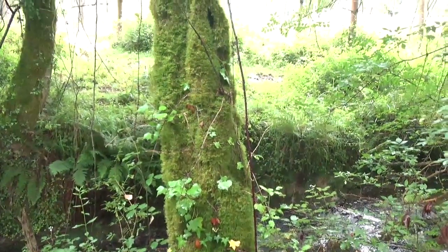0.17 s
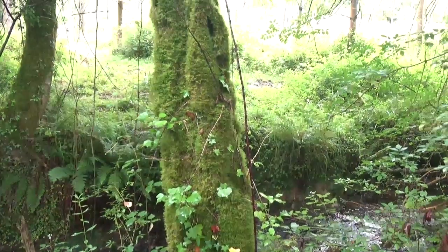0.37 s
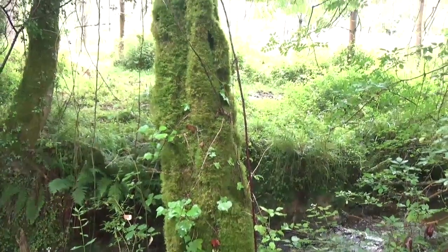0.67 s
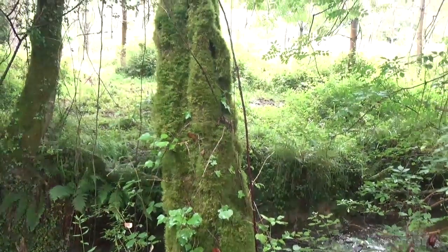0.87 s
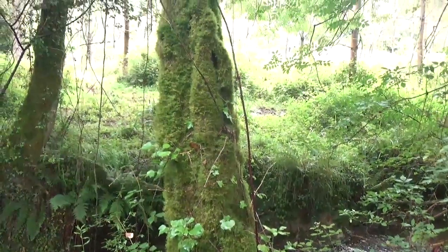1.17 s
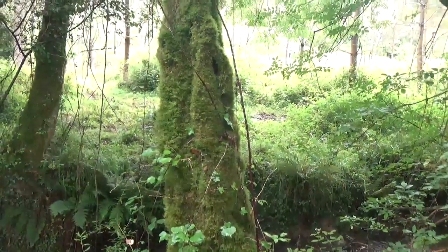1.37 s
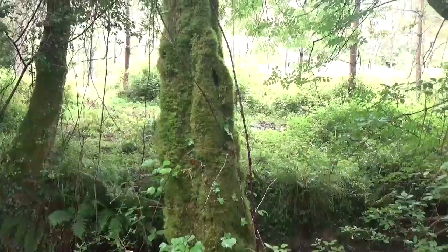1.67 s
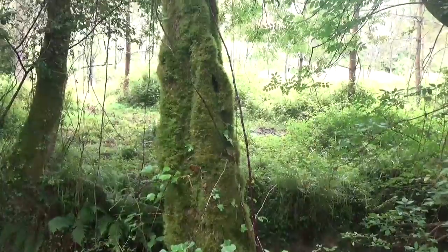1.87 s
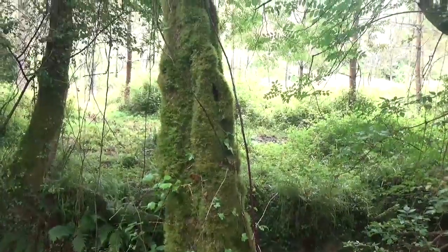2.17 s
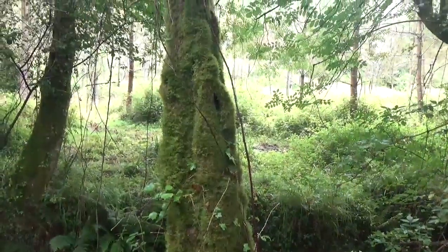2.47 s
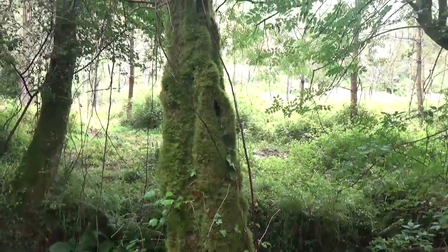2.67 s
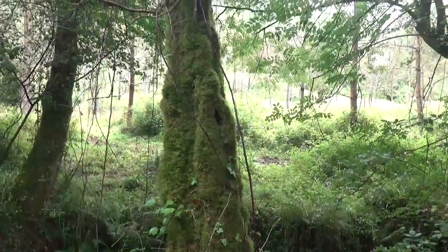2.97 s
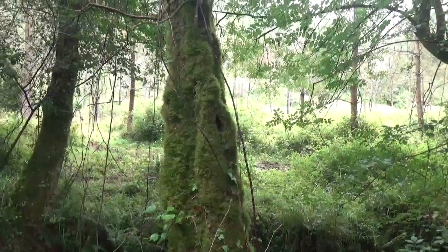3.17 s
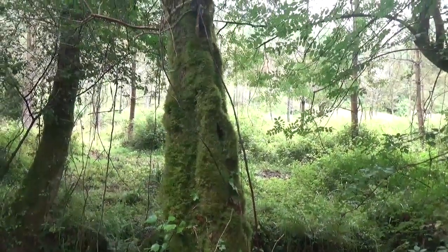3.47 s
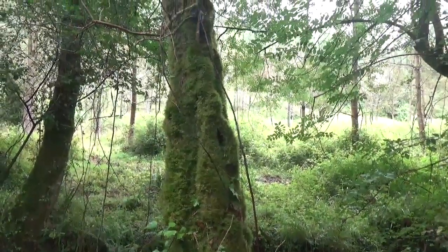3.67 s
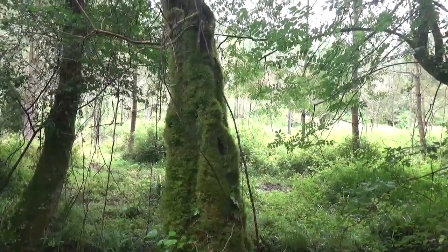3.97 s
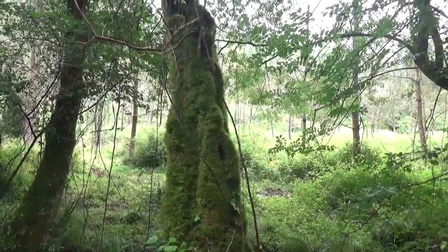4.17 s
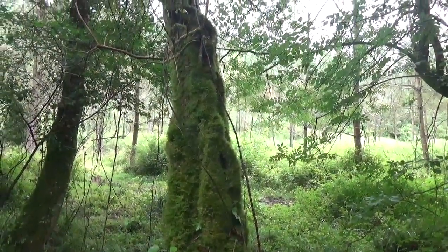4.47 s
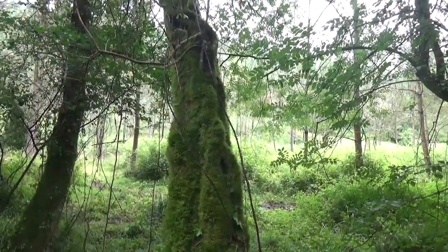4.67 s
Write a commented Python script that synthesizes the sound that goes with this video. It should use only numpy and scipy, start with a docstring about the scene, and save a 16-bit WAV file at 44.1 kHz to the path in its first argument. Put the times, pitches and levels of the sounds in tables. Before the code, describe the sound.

A shallow stream babbles and patters steadily over stones in a wood, with thin bird chirps and a faint distant engine hum slowly rising.

```python
"""A shallow stream runs over stones in a wood, with thin bird calls, a distant engine that slowly
speeds up, and a few soft knocks of a hand on the microphone.
Far water is shaped, flickering noise; bubbles are damped sines that rise in pitch; drops are very short ones;
splashes are bursts of bright noise. Birds are warbling sine glides, the engine is one wavering sine, and knocks
are low damped sines. Scattered echoes surround the near water, the birds and the engine."""
import sys
import numpy as np
from scipy import signal
from scipy.fft import rfft, irfft
from scipy.io import wavfile

SR = 44100
rng = np.random.default_rng(int(sys.argv[2]) if len(sys.argv) > 2 else 0)


def waveform_to_disk(signal):
    """Save audio, clipped to [-1, 1], as 16-bit WAV at the path in sys.argv[1]."""
    frames = np.transpose(np.atleast_2d(signal))
    scaled = np.clip(frames, -1, 1) * 32767
    samples = np.round(scaled).astype(np.int16)
    wavfile.write(sys.argv[1], SR, samples)


def ratio(d):
    """dB to gain"""
    e = np.asarray(d, float) / 20
    return 10 ** e


N = 212948

# loudest bubbles: (time [s], level before the envelope [dB], starting pitch [Hz])
LOUD_BUBBLES = [(0.011, -32, 780), (0.04, -33, 623), (0.059, -32, 546), (0.077, -29, 4740),
                (0.087, -34, 570), (0.145, -30, 3004), (0.21, -26.5, 1223), (0.231, -32, 1680),
                (0.254, -28, 8430), (0.274, -34, 983), (0.323, -32, 1994), (0.325, -33, 3180),
                (0.362, -27, 7400), (0.405, -28, 1588), (0.528, -32, 2690), (0.581, -27.5, 2020),
                (0.613, -27, 8530), (0.617, -31, 1695), (0.641, -31, 1420), (0.68, -26.5, 1490),
                (0.713, -32, 1050), (0.74, -30.5, 840), (0.771, -32, 744), (0.787, -33, 940),
                (0.839, -34, 914), (0.916, -28.5, 1900), (0.921, -36, 1052), (0.927, -31, 1268),
                (0.957, -30, 1020), (1.021, -28, 7770), (1.051, -27.5, 1920), (1.075, -34.5, 720),
                (1.075, -33, 2748), (1.266, -33, 845), (1.284, -32, 3280), (1.299, -28, 6030),
                (1.303, -36, 1720), (1.316, -30.5, 1001), (1.496, -31, 2280), (1.516, -31, 2860),
                (1.524, -33, 1065), (1.586, -28, 7200), (1.637, -36, 1331), (1.67, -27, 7550),
                (1.701, -30, 1305), (1.702, -36, 2600), (1.75, -34, 1975), (1.754, -34, 1644),
                (1.785, -35, 1454), (1.86, -32, 4540), (1.862, -31.5, 1356), (1.946, -30.5, 1564),
                (1.948, -30, 6040), (2.004, -30, 1232), (2.044, -34, 1127), (2.127, -24, 8100),
                (2.133, -30.5, 553), (2.162, -25.5, 8090), (2.183, -35, 1938), (2.358, -32.5, 1983),
                (2.358, -31, 4726), (2.382, -33, 1347), (2.389, -34.5, 2295), (2.589, -33, 2224),
                (2.624, -35, 1239), (2.628, -30.5, 4970), (2.654, -33, 1343), (2.675, -39, 1130),
                (2.69, -35, 2190), (2.708, -34, 2203), (2.727, -36, 1440), (2.738, -34, 2960),
                (2.739, -30, 2440), (2.905, -31, 1630), (2.957, -35, 533), (2.983, -29, 1009),
                (3.046, -40, 1715), (3.096, -29.5, 1397), (3.123, -23, 8600), (3.129, -33, 898),
                (3.206, -31, 1420), (3.214, -34, 4514), (3.225, -33, 1537), (3.246, -34, 1887),
                (3.276, -32, 1233), (3.299, -31, 2707), (3.302, -33, 965), (3.341, -32.5, 914),
                (3.369, -33, 2310), (3.395, -33, 6020), (3.6, -29.5, 2070), (3.639, -34, 799),
                (3.707, -33, 1310), (3.738, -25, 9510), (3.831, -30.5, 2090), (3.843, -33, 1690),
                (3.868, -32, 2820), (3.875, -30, 2090), (3.882, -26.5, 1220), (3.953, -40, 814),
                (4.025, -26, 1345), (4.1, -29, 1117), (4.184, -34, 3470), (4.19, -35, 531),
                (4.242, -34, 1255), (4.268, -26, 7080), (4.304, -32, 4580), (4.317, -37, 476),
                (4.341, -30, 1210), (4.359, -36, 1424), (4.389, -34, 3790), (4.399, -32, 780),
                (4.409, -34, 2120), (4.525, -31, 1547), (4.62, -30, 955), (4.704, -32, 2290),
                (4.744, -27, 8800), (4.778, -30, 990)]
# sharpest drops on stone: (time [s], level before the envelope [dB], starting pitch [Hz])
SHARP_DROPS = [(0.0258, -33, 7170), (0.1497, -24, 8760), (0.2134, -23, 10600), (0.4633, -33, 7090),
               (0.5686, -23, 10340), (0.7872, -20, 8050), (0.985, -29, 8000), (1.012, -30, 6500),
               (1.2201, -22, 7040), (1.2677, -23, 7035), (1.361, -23, 9920), (1.432, -26, 6810),
               (1.813, -24, 7800), (1.826, -30, 8450), (1.976, -23, 7000), (2.0486, -26, 9140),
               (2.326, -24, 10280), (2.4197, -22, 7250), (2.513, -20, 8470), (2.6586, -34, 9370),
               (2.7318, -27, 9580), (2.8928, -30.5, 7850), (3.051, -27, 8800), (3.06, -29, 7810),
               (3.1169, -34, 8690), (3.1458, -22, 10060), (3.673, -25, 10470), (3.7385, -19, 9310),
               (3.863, -21, 10210), (3.9439, -31, 9690), (4.0223, -38, 6680), (4.155, -24, 9870),
               (4.1847, -19, 10170), (4.268, -26, 7610), (4.398, -31, 8630), (4.5, -25, 10210),
               (4.6024, -23, 7770), (4.7444, -23, 10000), (4.775, -27, 9000)]


def rms_one(x):
    """Scale to rms 1."""
    return x / np.sqrt(np.mean(x ** 2) + 1e-20)


def in_time(rows):
    """Columns of a curve, one value per sample."""
    s, *columns = np.transpose(rows)
    return [np.interp(np.arange(N) / SR, s, c) for c in columns]


def at_hz(points, hz):
    """Read a curve on a log-frequency axis."""
    points_hz, values = np.transpose(points)
    return np.interp(np.log(hz), np.log(points_hz), values)


def drift(rate_hz):
    """Random wander of rms 1: noise through two equal poles at rate_hz, run at SR / 40."""
    r = np.exp(-2 * np.pi * rate_hz * 40 / SR)
    noise = rng.standard_normal(N // 40 + 2002)
    slow = signal.lfilter([1], [1, -2 * r, r * r], noise)[2000:]   # skip the filter's start
    return np.interp(np.arange(N) / 40, np.arange(len(slow)), rms_one(slow))


def hiss(spectrum, patchy_db, rate_hz):
    """Stereo noise of rms 1 in overlapping bands 2/3 octave apart, flickering partly together, partly alone."""
    # (frequency [Hz], left-right correlation [0..1])
    likeness = [(60, 1), (170, 0.9), (490, 0.86), (1410, 1), (4030, 0.96), (11500, 0.92)]
    hz = np.maximum(np.fft.rfftfreq(N, 1 / SR), 1)
    mid, side = rfft(rng.standard_normal((2, N))) * ratio(at_hz(spectrum, hz))
    alike = np.clip(at_hz(likeness, hz), 0, 1)
    both = np.sqrt(1 + alike) * mid + np.sqrt(1 - alike) * side * [[1], [-1]]
    third_octave = 3 * np.log2(hz)
    lowest = np.floor(3 * np.log2(spectrum[0][0]))
    highest = 3 * np.log2(spectrum[-1][0])
    out, together = 0, drift(rate_hz)
    for centre in np.arange(lowest, highest + 2, 2):
        band = np.cos(np.pi / 4 * np.clip(third_octave - centre, -2, 2)) ** 2
        flicker_db = patchy_db * (0.4 * together + drift(rate_hz))
        out = out + irfft(both * band, N) * ratio(flicker_db)
    return rms_one(out)


def ring(s, level_db, hz, t60_ms, rise, spread_db, pinch_cycles=0.33, length=2048):
    """Damped sines, climbing in pitch as a bubble does near the surface; each leans left or right by chance."""
    t = np.arange(length) / SR
    decay = (np.log(1000) * 1000 / np.maximum(t60_ms, 1))[:, None] * t
    phase = 2 * np.pi * hz[:, None] * t * (1 + rise * np.minimum(decay, 7))
    swell = 1 - np.exp(-hz[:, None] * t / pinch_cycles)   # onset as the neck pinches off
    grains = ratio(level_db)[:, None] * swell * np.exp(-decay) * np.sin(phase)
    lean_db = spread_db * rng.standard_normal((len(s), 1))
    at = (np.round(s * SR).astype(int)[:, None] + np.arange(length)).ravel()
    ears = [(grains * ratio(side * lean_db)).ravel() for side in (1, -1)]
    return np.array([np.bincount(at, ear, N + length)[:N] for ear in ears])


def wood(x, t60_s, wet_db, apart=0.29):
    """Trunks and banks scatter the sound into a fading cloud of echoes, partly different for each ear."""
    t = np.arange(round(0.6 * SR)) / SR
    noise = rng.standard_normal((2, len(t)))
    sparse = rng.random((2, len(t))) < 0.05
    mid, side = noise * sparse * ratio(-60 * t / t60_s) * (t > 0.004)
    echoes = mid + apart * side * [[1], [-1]]
    echoes /= np.sqrt(np.sum(echoes ** 2, axis=1, keepdims=True))
    return x + ratio(wet_db) * signal.fftconvolve(x * np.ones((2, 1)), echoes, axes=1)[:, :N]


def births(surge_db, chance, clump_db, steep):
    """Random moments [s], denser in surges and in quick clumps."""
    total = np.cumsum(ratio(steep * surge_db + clump_db * drift(16)))
    return np.searchsorted(total, chance * total[-1]) / SR


def swarm(rows):
    """Lift of the flow [dB] that crowds small bubbles or drops round each listed one."""
    lift_db, width_s = 2.5, 0.018
    marks = np.bincount((np.transpose(rows)[0] * SR).astype(int), minlength=N)[:N]
    reach_s = np.arange(-SR // 10, SR // 10) / SR
    return lift_db * np.tanh(signal.fftconvolve(marks, np.exp(-(reach_s / width_s) ** 2), "same"))


def drone():
    """One low engine order: a sine of rising pitch, wavering a little with the air."""
    # (time [s], pitch before wavering [Hz], level before trim and wavering [dB])
    engine = [(0, 56.7, -71), (1, 58.5, -67), (2.4, 62.5, -59.5), (3.5, 65.2, -61), (4.83, 66.1, -61)]
    hz, level_db = in_time(engine)
    gain = ratio(level_db + 1.0 + 2.4 * drift(3.0))
    return gain * np.sin(2 * np.pi * np.cumsum(hz + 0.8 * drift(3.0)) / SR)


def birds():
    """Near-sine glides with a fast uneven warble, fluttering in level on their way through the leaves."""
    # (time [s], length [s], first pitch [Hz], last pitch [Hz], level before flutter [dB])
    notes = [(0.023, 0.024, 6200, 7400, -37.5), (0.041, 0.027, 7420, 7130, -37.5),
             (0.249, 0.044, 6220, 6450, -41), (0.303, 0.063, 6350, 6400, -41),
             (0.586, 0.041, 6284, 6380, -39.5), (.74, 0.062, 6430, 7967, -40.5),
             (0.764, 0.099, 8520, 8630, -41), (0.822, 0.082, 8350, 8030, -36.5),
             (0.901, 0.07, 8110, 8030, -44), (0.978, 0.027, 7370, 6880, -37.5),
             (1.033, 0.027, 5690, 5480, -44.5), (1.166, 0.069, 7240, 7010, -37),
             (1.387, 0.039, 8160, 7600, -42.5), (1.78, 0.025, 6740, 6100, -34.5),
             (2.795, 0.074, 8600, 8550, -35.5), (2.818, 0.056, 8150, 8100, -40),
             (2.876, 0.048, 7910, 7960, -39.5), (3.849, 0.057, 6796, 6400, -47),
             (4.004, 0.038, 6770, 6720, -50), (4.04, 0.06, 6540, 6504, -43.5),
             (4.286, 0.037, 5590, 5540, -38), (4.314, 0.02, 5210, 5040, -37.5),
             (4.33, 0.06, 5500, 5540, -56), (4.355, 0.029, 5160, 5120, -46)]
    warble_hz, warble_power = 125, 2.37   # rms depth at 7 kHz; growth of depth with pitch
    out, warble = np.zeros(N), drift(350)
    for s, length_s, first_hz, last_hz, level_db in notes:
        u, at = np.linspace(0, 1, round(length_s * SR)), round(s * SR)
        hz = first_hz + (last_hz - first_hz) * u
        hz = hz + warble_hz * (hz / 7000) ** warble_power * warble[at:at + len(u)]
        swell = np.sin(np.pi * u) ** 0.6
        out[at:at + len(u)] += ratio(level_db) * swell * np.sin(2 * np.pi * np.cumsum(hz) / SR)
    return out * ratio(1.7 * drift(48))


def knocks():
    """Soft knocks on the microphone body: low damped sines of almost steady pitch."""
    # (time [s], level before the envelope [dB], starting pitch [Hz], t60 [ms])
    hits = [(.042, -25.5, 250, 46), (0.801, -36, 249.3, 48), (1.29, -36, 298, 46)]
    return ring(*np.transpose(hits), rise=0.00098, spread_db=2.0)


def rush():
    """Far water: broad low and middle noise with a slow flicker."""
    # (frequency [Hz], relative density [dB per Hz])
    rush_spectrum = [(18, -40), (30, -20), (50, -5.5), (80, -9), (150, -3.5), (280, -3), (430, -6.5),
                     (620, -4.5), (900, -2), (1420, -1), (2500, -4), (4500, -12), (7150, -25),
                     (12100, -120)]
    return ratio(-43.5) * hiss(rush_spectrum, patchy_db=1.0, rate_hz=7.9)


def spray():
    """Fine spray: treble noise with a fast flicker."""
    # (frequency [Hz], relative density [dB per Hz])
    spray_spectrum = [(2350, -24), (4000, -5.5), (5400, -5), (6300, -0.5), (7800, 1.5), (11200, -1),
                      (14300, -34), (22000, -120)]
    return ratio(-43.5) * hiss(spray_spectrum, patchy_db=1.5, rate_hz=63.0)


def splashes():
    """Short bright bursts of spray: gated, flickering high-passed noise."""
    # (time [s], length [s], nominal rms level [dB])
    bursts = [(0.572, 0.027, -41), (4.27, 0.056, -42)]
    t, gate = np.arange(N) / SR, np.zeros(N)
    for s, length_s, level_db in bursts:
        attack, release = (t - s) / 0.002, (s + length_s - t) / 0.0066
        gate += ratio(level_db) * np.clip(np.minimum(attack, release), 0, 1)
    noise = rng.standard_normal(N) * ratio(3.4 * drift(150))
    highpass = signal.butter(1, 2500, "high", fs=SR, output="sos")
    return gate * rms_one(signal.sosfilt(highpass, noise))


def drops(surge_db, count=900):
    """Drops tick for a few cycles: the sharpest as listed, a dense patter under them."""
    chance = rng.random((count, 3))
    s = births(surge_db, chance[:, 0], clump_db=4.5, steep=3.3)
    level_db = -38 + 5.43 * np.minimum(-np.log(chance[:, 2] + 1e-9), 2.8)
    hz = 6000 + 5500 * chance[:, 1]
    patter = ring(s, level_db, hz, np.full(count, 2.5), rise=0.012, spread_db=3.0, length=128)
    s, level_db, hz = np.transpose(SHARP_DROPS)
    return patter + ring(s, level_db, hz, np.full(len(s), 3.5), rise=0.0076, spread_db=0.5, length=256)


def babble(surge_db, count=2400):
    """Small bubbles: big ones ring low and long; a hollow under a stone keeps giving some of nearly one size."""
    # (pitch [Hz], base level before size and envelope [dB])
    base_level = [(250, -56.5), (550, -50), (900, -45), (1400, -43), (2200, -43), (4500, -47.5),
                  (7000, -45), (10500, -42.5)]
    hollow_hz = 565
    chance = rng.random((count, 5))
    s = births(surge_db, chance[:, 0], clump_db=3.0, steep=3.0)
    hz = 250 * (10800 / 250) ** chance[:, 1] ** 0.8
    from_hollow = chance[:, 4] < 0.03
    hz = np.where(from_hollow, hollow_hz * ratio(0.16 * (chance[:, 1] - 0.5)), hz)
    size_db = 2.7 * np.minimum(-np.log(chance[:, 2] + 1e-9), 2.2)
    t60_ms = 55 * (1000 / hz) ** 0.47 * ratio(12.2 * (chance[:, 3] - 0.5))
    level_db = at_hz(base_level, hz) + size_db
    return ring(s, level_db, hz, t60_ms, rise=0.011, spread_db=1.66, pinch_cycles=2.2, length=1280)


def plops():
    """The loudest bubbles: the smaller, the higher and the shorter."""
    s, level_db, hz = np.transpose(LOUD_BUBBLES)
    t60_ms = 43.8 * (1000 / hz) ** 0.64
    return ring(s, level_db, hz, t60_ms, rise=0.0054, spread_db=0.0, pinch_cycles=1.56)


def near_water():
    """Bubbles, drops and splashes; small bubbles and drops are born more densely as the flow surges."""
    # (time [s], gurgling [dB], spattering [dB]); only the changes count, as birth density
    flow = [(0, -43, -47), (.3, -43, -47), (.6, -43, -46), (.9, -42.5, -47), (1.2, -44, -47),
            (1.45, -44, -48), (1.7, -44, -47), (2, -43, -46), (2.3, -43, -47), (2.52, -45, -47),
            (2.7, -42, -47), (2.9, -44, -47), (3.25, -42.5, -46), (3.5, -44.5, -48), (3.85, -43, -48),
            (4.1, -44, -47), (4.35, -42.5, -46), (4.55, -44, -48), (4.83, -43, -46)]
    gurgle_db, spatter_db = in_time(flow)
    bubbles = plops() + babble(gurgle_db + swarm(LOUD_BUBBLES))
    return bubbles + drops(spatter_db + swarm(SHARP_DROPS)) + splashes()


def scene():
    """Engine, birds, knocks and water."""
    mix = wood(drone(), t60_s=0.22, wet_db=-7.0, apart=0.95)
    mix = mix + wood(birds(), t60_s=0.6, wet_db=-3.5)
    mix = mix + knocks() + rush() + spray()
    mix = mix + wood(near_water(), t60_s=0.17, wet_db=-8.0)
    return mix * ratio([[0.4], [-0.4]])   # all leans a little left


def low_pass(x):
    """Removes everything above the highest recorded frequency."""
    return signal.sosfilt(signal.butter(12, 12130, fs=SR, output="sos"), x)


def record(dry):
    """The top is cut steeply above 11050 Hz."""
    lowpass = signal.ellip(14, 0.3, 75, 11050, fs=SR, output="sos")
    return low_pass(signal.sosfilt(lowpass, dry))


dry = scene()
out = record(dry)
waveform_to_disk(out)
```